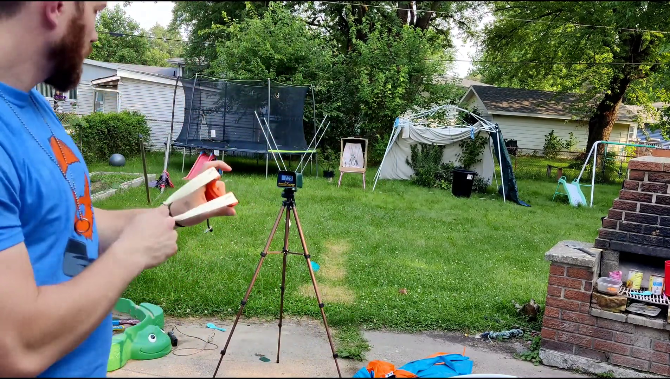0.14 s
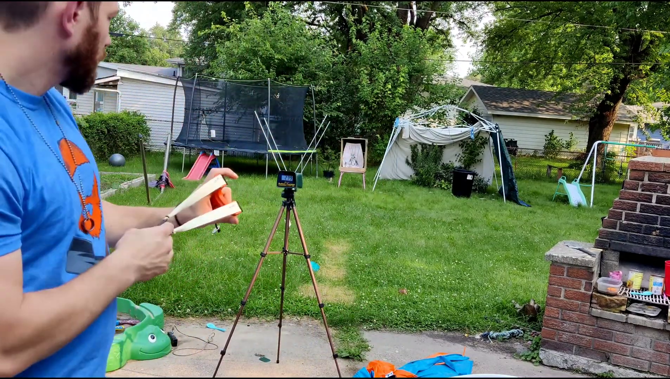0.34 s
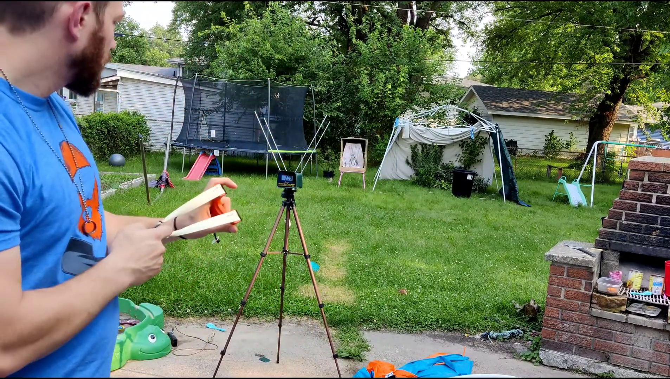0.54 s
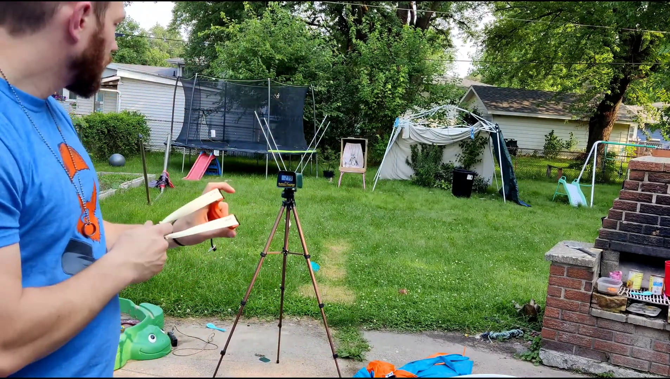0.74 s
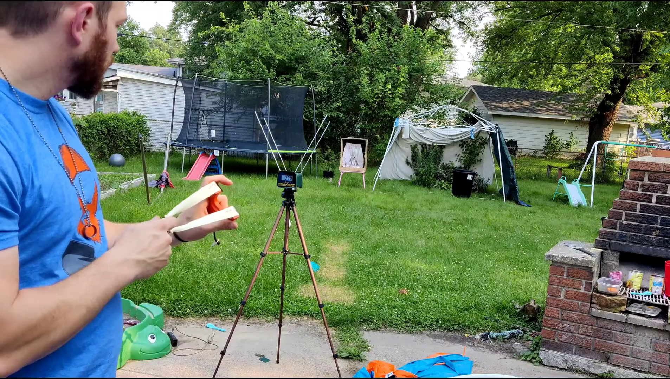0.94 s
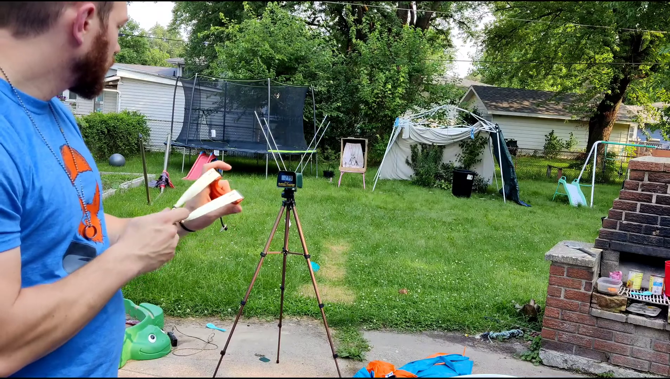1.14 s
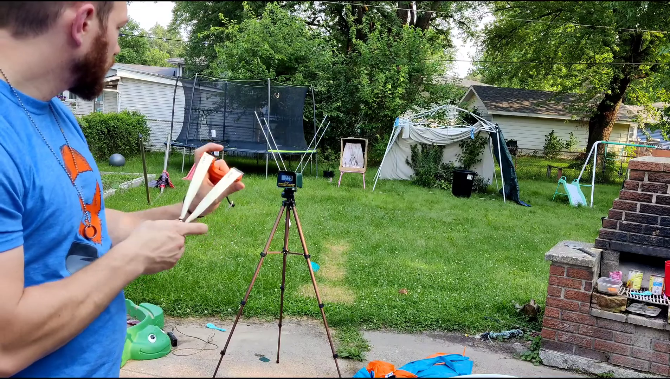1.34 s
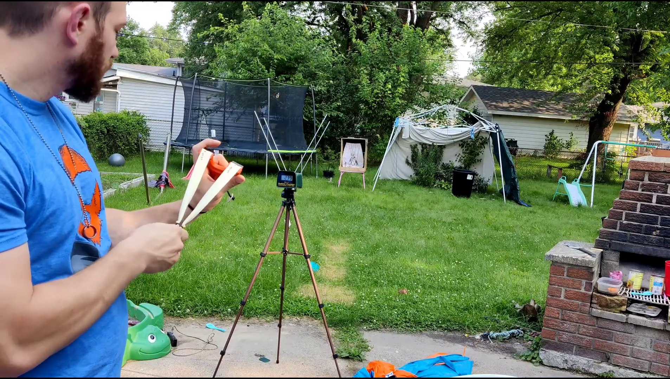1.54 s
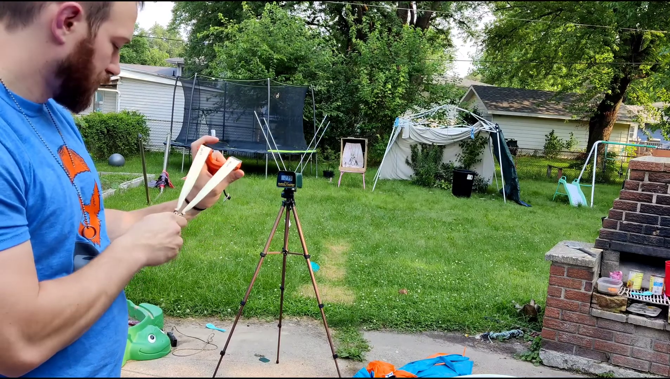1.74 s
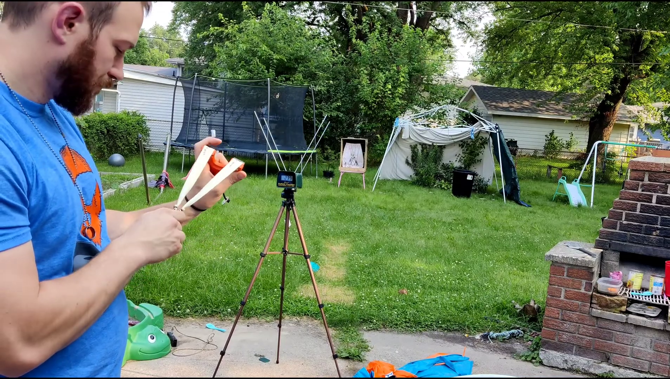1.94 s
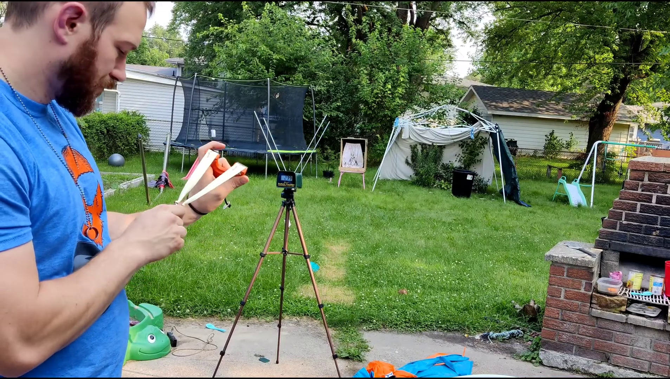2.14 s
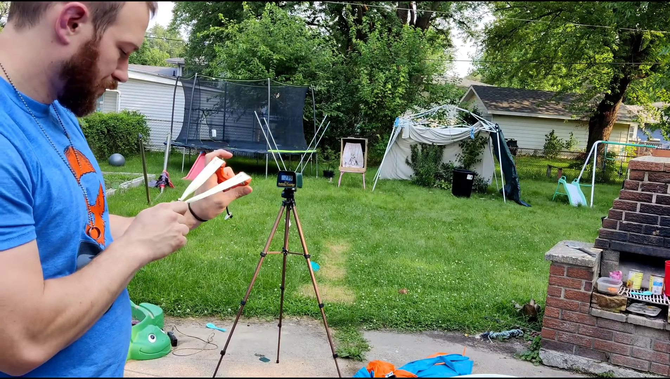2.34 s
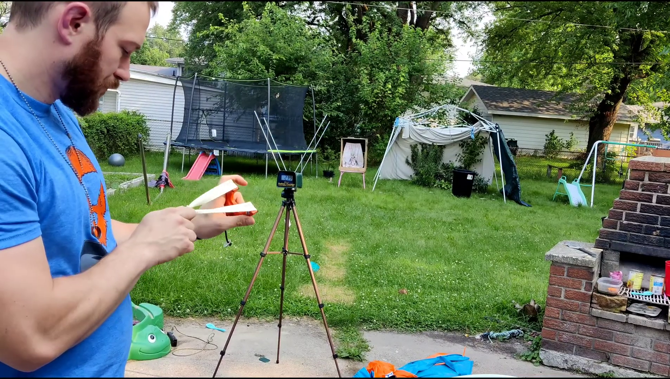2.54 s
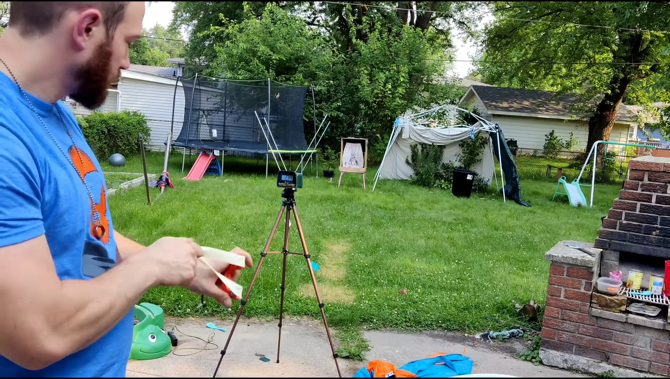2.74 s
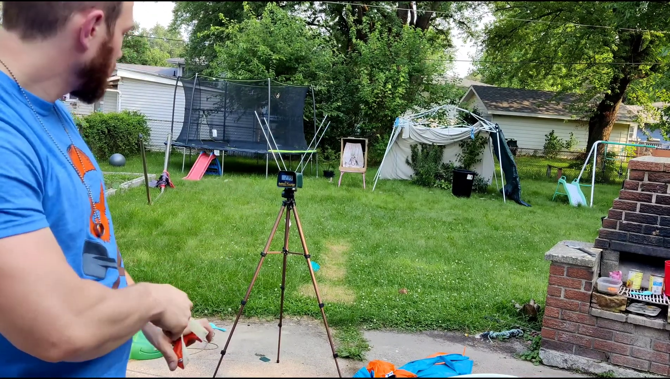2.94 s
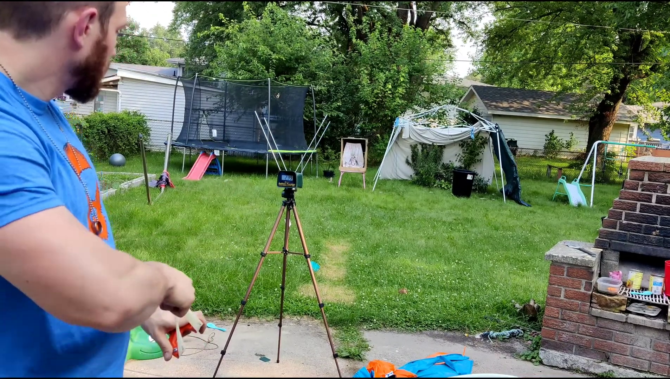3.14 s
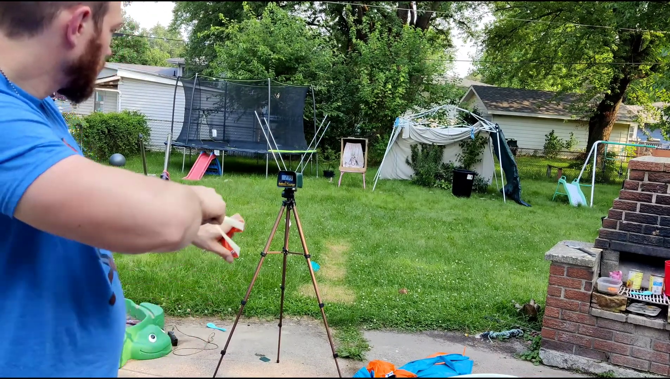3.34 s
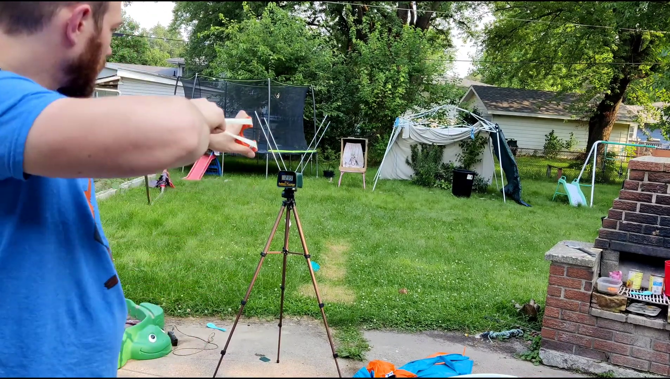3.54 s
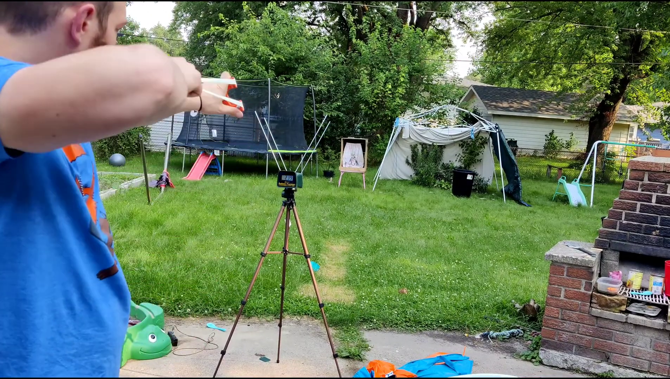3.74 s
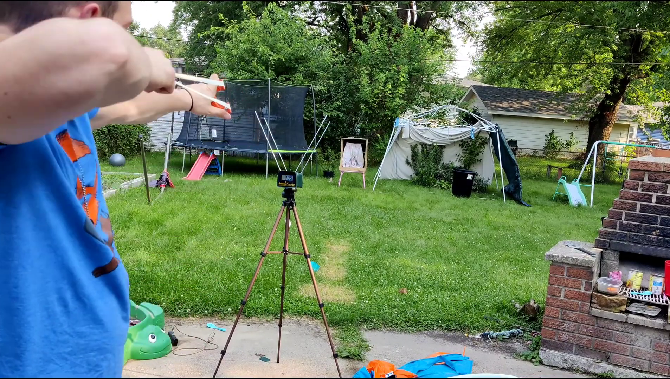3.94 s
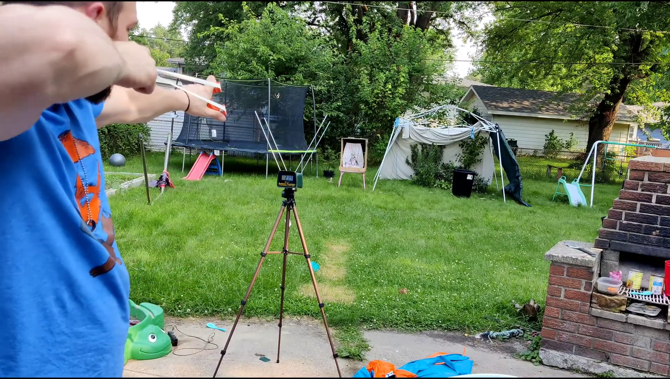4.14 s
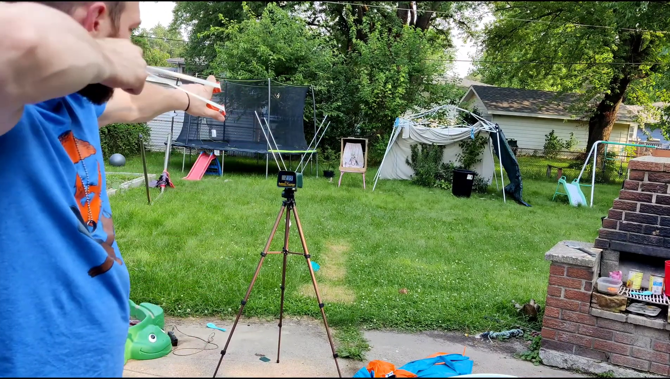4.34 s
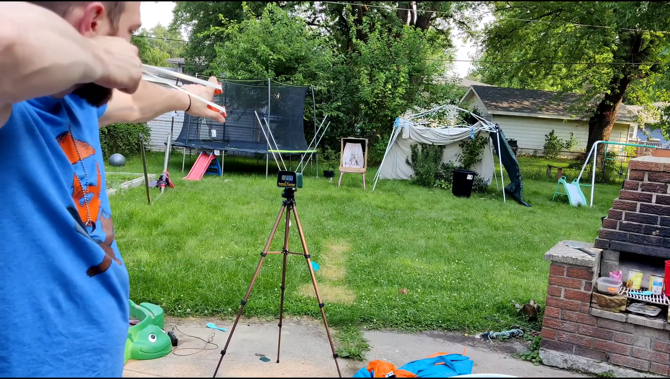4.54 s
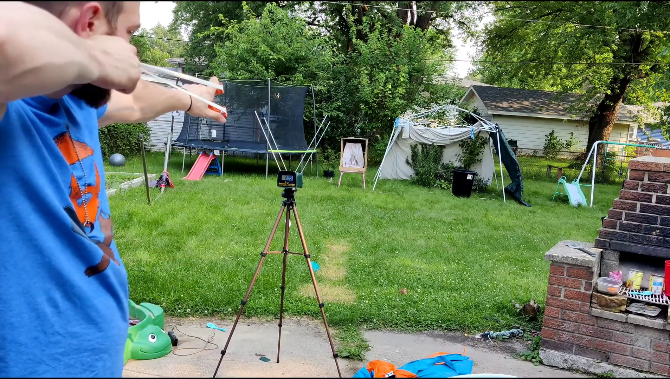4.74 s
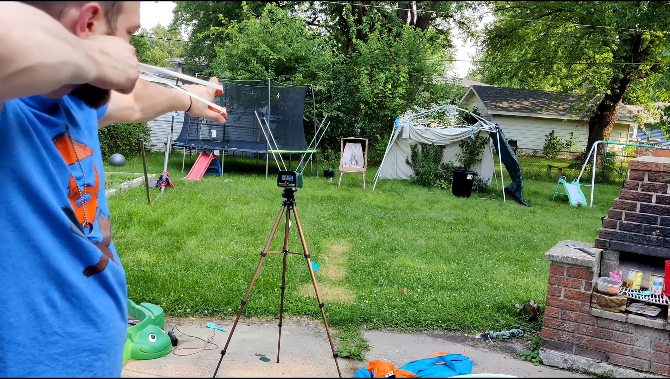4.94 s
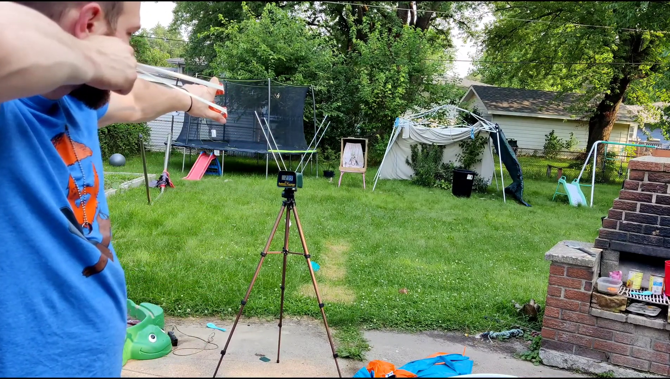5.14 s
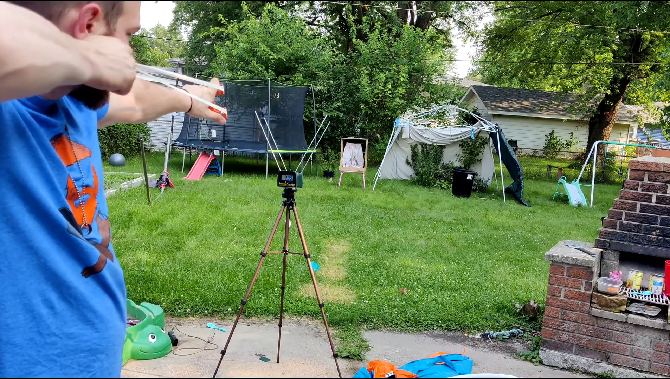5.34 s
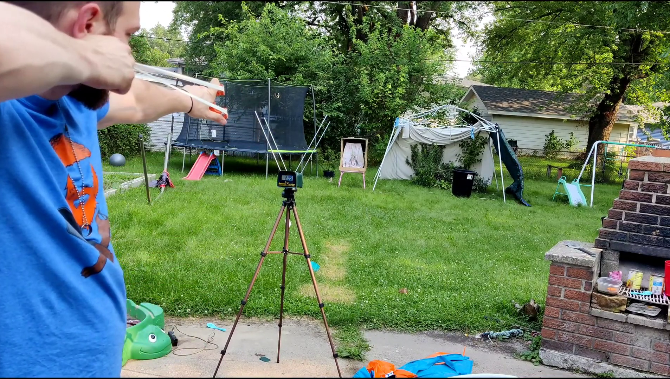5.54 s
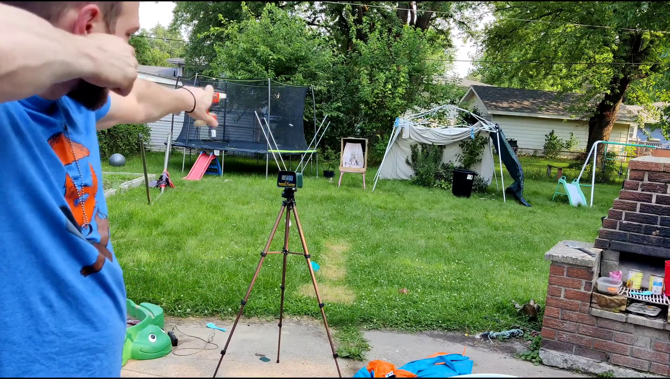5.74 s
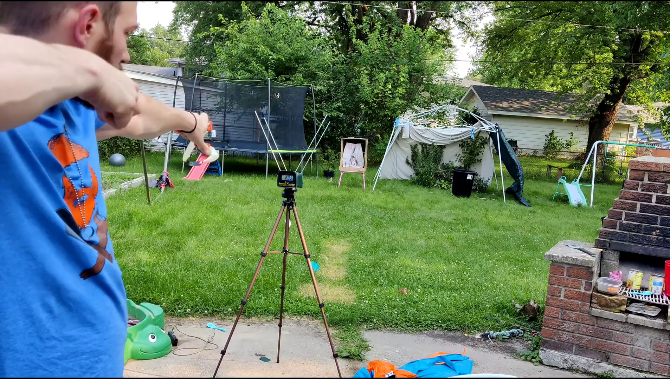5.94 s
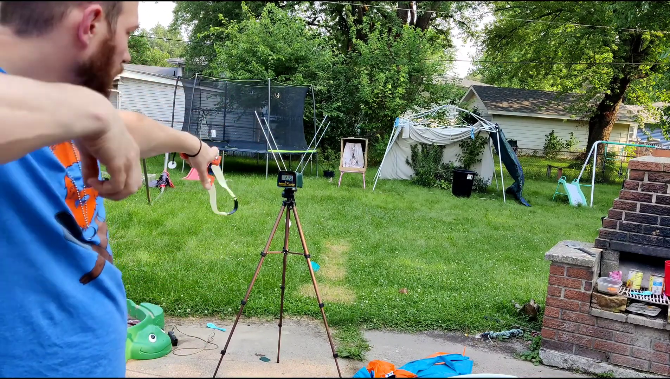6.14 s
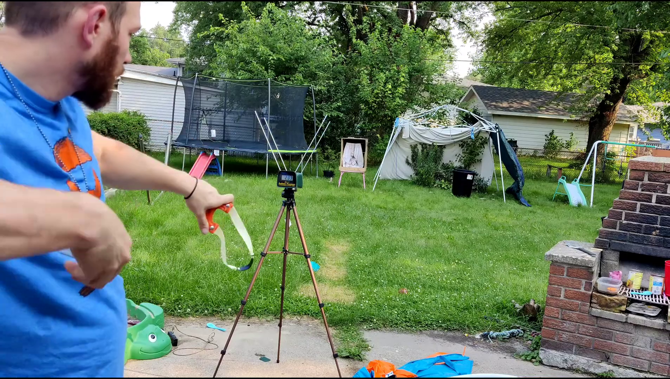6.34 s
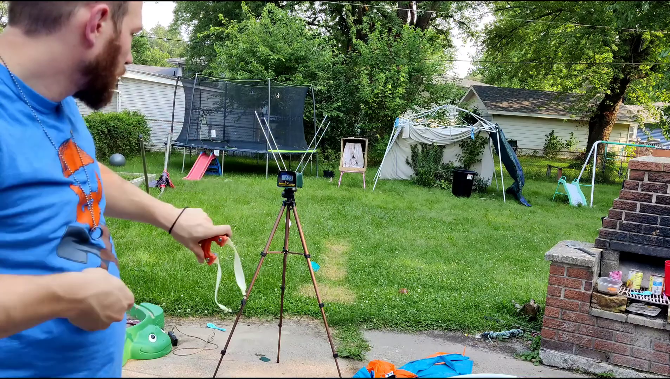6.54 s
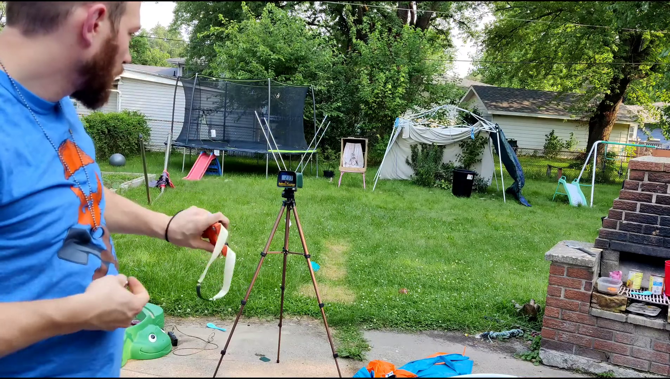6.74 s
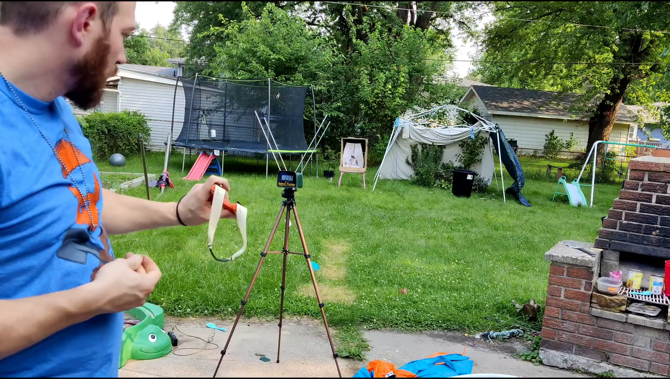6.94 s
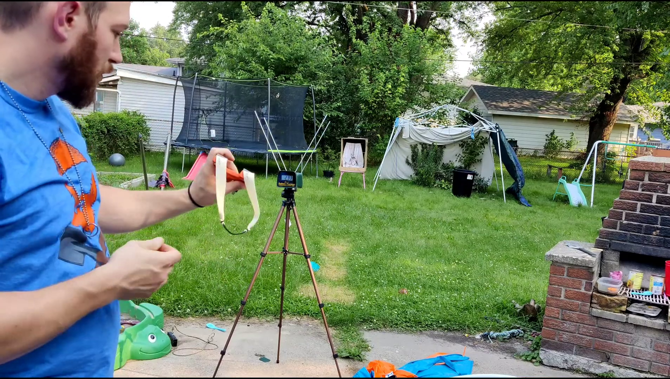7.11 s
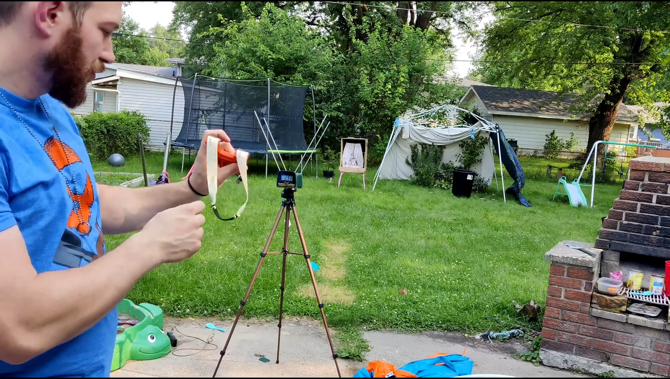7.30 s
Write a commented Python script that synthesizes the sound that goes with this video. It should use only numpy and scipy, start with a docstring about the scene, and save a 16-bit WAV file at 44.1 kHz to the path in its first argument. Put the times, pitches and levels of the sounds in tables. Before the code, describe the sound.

Birds chirp repeatedly over faint traffic and light wind, then two sharp cracks as a slingshot fires and its ball hits a board.

```python
"""A back garden: a slingshot fires a step from a phone with a microphone port at each end.
The bands snap, slap and later tick in the hand; a puff of air reaches the left port; a quarter
second later the steel ball cracks into a board down the lawn. A near sparrow and four far birds
call over town noise, fan hum and low gusts. Fences and house walls echo the shot and the birds."""
import sys
import numpy as np
from scipy import signal
from scipy.fft import rfft, irfft, next_fast_len
from scipy.io import wavfile
from scipy.ndimage import uniform_filter1d

SR = 44100
rng = np.random.default_rng(int(sys.argv[2]) if len(sys.argv) > 2 else 0)


def bounce(signal):
    """Save signal as a 16-bit WAV file at the path given by the first command-line argument."""
    frames = np.transpose(np.atleast_2d(signal))
    limited = np.clip(frames, -1, 1)
    pcm = np.round(limited * 32767).astype(np.int16)
    wavfile.write(sys.argv[1], SR, pcm)


N = 325009
T = np.arange(N) / SR
FFT_SIZE = next_fast_len(N + SR // 2)
HZ = np.arange(FFT_SIZE // 2 + 1) * SR / FFT_SIZE + 1e-3
SIDE = np.array([[.5], [-.5]])  # left, right share of a lag or pan


def undb(db):
    """Decibels to gain."""
    return 10 ** (np.asarray(db) / 20)


def on_hz(points):
    """Joins (hz, value) points on a log-frequency axis."""
    hz, value = np.transpose(points)
    return np.interp(np.log(HZ), np.log(hz), value)


def shape(x, gain):
    """Weights the spectrum by a real or complex gain."""
    return irfft(rfft(x, FFT_SIZE) * gain, FFT_SIZE)[..., :N]


def causal(points):
    """Minimum-phase gain through (hz, db) points: nothing rings before a hit."""
    cepstrum = irfft(np.log(undb(on_hz(points))), FFT_SIZE)
    cepstrum[1:FFT_SIZE // 2] *= 2
    cepstrum[FFT_SIZE // 2 + 1:] = 0
    return np.exp(rfft(cepstrum))


def ports(x, lag_ms, pan_db):
    """One sound at both ports; lag and pan are left minus right."""
    return shape(x, undb(SIDE * pan_db) * np.exp(-2j * np.pi * HZ * SIDE * lag_ms / 1000))


def level(x, db):
    """Sets the rms level."""
    return x * undb(db) / np.sqrt(np.mean(x ** 2))


def walk(rate_hz):
    """Random steps, smoothed twice; spread near 1."""
    hold = int(SR / rate_hz)
    steps = np.repeat(rng.standard_normal(N // hold + 1), hold)
    return 1.18 * uniform_filter1d(uniform_filter1d(steps, hold), hold)[:N]


def fade(t, t60_s):
    """Zero before t = 0, then 60 dB down after t60_s."""
    return (t >= 0) * np.exp(-np.log(1000) * np.abs(t) / t60_s)


def burst(t, t60_s, rise_s):
    """Fade with a rounded onset."""
    return fade(t, t60_s) * (1 - fade(t, rise_s))


def band_slaps():
    """Pouch and bands slap fingers and fork, then rebound: bursts of dull and bright crackle."""
    # start_s, level_db, t60_s, bright_over_dull_db, bright_rise_s
    slaps = [(5.876, -28, 0.026, -13, 0.00406), (5.8864, -23.5, 0.015, -4, .005),
             (5.8892, -6, 0.019, -1.5, 0.0087), (5.91, -20.5, 0.019, -1, .012),
             (5.9132, -10, 0.018, 4, .008)]
    rebound_s, rebound_db, t60_growth = .0059, -10, 1.53
    crackle = rng.standard_normal((2, 3, N)) * undb(2.27 * rng.standard_normal(N))
    dull = bright = 0
    for start_s, db, t60_s, tilt_db, rise_s in slaps:
        for k in range(4):
            t = T - (start_s + k * rebound_s)
            flap_db, flap_t60_s = db + k * rebound_db, t60_s * t60_growth ** k
            dull += undb(flap_db - tilt_db / 2) * burst(t, flap_t60_s, .0014)
            bright += undb(flap_db + tilt_db / 2) * burst(t, flap_t60_s, rise_s)
    dull_eq = causal([(60, -4), (230, -2.5), (520, -5), (900, 2), (1250, -14), (1600, .5), (1950, -8.5),
                      (2500, .5), (2950, -10.5), (3400, -.5), (4500, -24), (7500, -22), (10000, -49),
                      (16000, -51)])
    bright_eq = causal([(500, -44.5), (3000, -14), (4500, -1), (9500, -5), (12500, -.5), (15500, -2.5)])
    snap = shape(dull * crackle[0], dull_eq) + shape(bright * crackle[1], bright_eq)
    common, per_port = snap[0], snap[1:]
    return ports(common, lag_ms=-.11, pan_db=.1) + undb(.5) * per_port


def ball_hit():
    """Steel strikes; board and frame rattle and ring. Returns the direct sound and the echo feed."""
    # delay_s, level_db, t60_s, pan_db
    rattles = [(0, -10.5, 0.014, .1), (.003, -15.5, 0.02, -5), (.0085, -24, .015, 11.5),
               (0.016, -25.5, 0.05, -1)]
    # pitch_hz, level_db, t60_s
    board_modes = [(138.6, -14.5, 0.12), (245, -17.5, 0.074), (354, -24, 0.069), (701, -24, 0.068),
                   (808, -22.5, 0.07), (1050, -23, 0.044), (1440, -27.5, 0.09), (1620, -18, 0.044),
                   (2516, -29.5, 0.11), (4350, -13, 0.01), (5000, -12, 0.01), (6000, -18.5, 0.022)]
    hit_s = 6.1326
    t = T - hit_s
    rattle = sum(undb(db + SIDE * pan_db) * fade(t - delay_s, t60_s)
                 for delay_s, db, t60_s, pan_db in rattles)
    noise = rng.standard_normal((3, N))
    steel_eq = causal([(200, -8.5), (450, -10), (700, 4), (1700, 4), (2100, -1), (3300, -2), (5000, -2),
                       (9000, -1), (16000, 6)])
    crack = shape(rattle * (.75 * noise[0] + .66 * noise[1:]), steel_eq)
    crack -= shape(crack * (1 - fade(t, .054)), 1 / (1 + (8500 / HZ) ** 8))  # treble dies first
    ring = sum(undb(db) * burst(t, t60_s, rise_s=20 / hz) * np.sin(2 * np.pi * hz * t)
               for hz, db, t60_s in board_modes)
    click = shape(signal.unit_impulse(N, int(hit_s * SR)), steel_eq)
    thud = shape(ring, undb(-13.5) / (1 + (HZ / 450) ** 4))
    return crack + ring, click + thud


def air_puff():
    """Air pushed by the pouch presses on the left port, which leaks through its vent."""
    start_s, rise_s, hold_s, t60_s, vent_hz = 5.889, .012, .011, .1, 2.7
    rise = np.sin(np.pi / 2 * np.clip((T - start_s) / rise_s, 0, 1))
    fall = fade(np.clip(T - start_s - rise_s - hold_s, 0, None), t60_s)
    leak = 1j * HZ / vent_hz
    return shape(undb(-9.3) * rise * fall, leak / (1 + leak)) * undb([[0], [-30]])


def band_ticks():
    """Slack rubber unsticks in the hand: thin treble crackle."""
    # start_s, level_db, t60_s
    ticks = [(6.656, -67, .05), (6.768, -64, .04)]
    envelope = sum(undb(db) * burst(T - start_s, t60_s, .004) for start_s, db, t60_s in ticks)
    treble_eq = causal([(3000, -30), (7000, -6), (10500, 5), (15000, -10)])
    return ports(shape(envelope * rng.standard_normal(N), treble_eq), lag_ms=-.1, pan_db=4.4)


def whistles(parts, calls, slow_shake, quick_shake):
    """One bird's gliding tones; rasp shakes pitch, size and phase, the rougher the quicker."""
    out = np.zeros(N)
    loudest_mid_hz = max(parts, key=lambda part: part[5])[3]
    for start_s, call_db, call_hz in calls:
        for k, (offset_s, length_s, first_hz, mid_hz, last_hz, db, rasp) in enumerate(parts):
            i = int((start_s + offset_s) * SR) + np.arange(int(length_s * SR))
            u = np.linspace(0, 1, len(i))
            pure, shifted = np.sqrt(1 - rasp), i - 1000 * k  # each part shakes differently
            warble, real, imag = pure * slow_shake[:, shifted] + np.sqrt(rasp) * quick_shake[:, shifted]
            slope_hz = 4 * mid_hz - 3 * first_hz - last_hz
            bend_hz = 2 * (first_hz + last_hz - 2 * mid_hz)
            glide_hz = call_hz / loudest_mid_hz * (first_hz + slope_hz * u + bend_hz * u ** 2)
            pitch_hz = glide_hz * (1 + .045 * rasp * np.tanh(warble))
            phasor = np.exp(2j * np.pi * np.cumsum(pitch_hz) / SR)
            voice = phasor * (pure + np.sqrt(rasp / 2) * (real + 1j * imag)) + undb(-41) * phasor ** 3
            rolloff_db = np.clip(glide_hz - 6300, 0, None) / -130  # above the ports' resonance
            envelope = np.sin(np.pi * u) ** (.3 + .35 * rasp)
            out[i] += np.sqrt(2) * undb(call_db + db + rolloff_db) * envelope * voice.real
    return out


def birds(echo):
    """Five perched birds whistle with a breathy hiss; moving leaves flutter their echo."""
    # offset_s, length_s, first_hz, mid_hz, last_hz, level_db, rasp (0-1); transposed per call
    sparrow = [(-.04, 0.034, 5950, 6100, 6300, -17.5, .85), (-.008, 0.015, 4020, 4455, 4530, -10, 0.1),
               (.008, 0.02, 4693, 4721, 4650, -7, 0.1), (.022, .013, 4650, 4300, 3900, -10.5, .15),
               (.033, .016, 3900, 3680, 3560, -19, .35), (.031, .035, 6300, 5810, 5440, -21, .9),
               (.055, .03, 3680, 3600, 3480, -21.5, .4), (.086, .032, 3456, 3520, 3450, -20, .4)]
    riser = [(0, .035, 4200, 4500, 4800, -7, .6), (.02, .06, 4850, 5000, 5100, 0, .62),
             (.025, .075, 5650, 5800, 5950, -1, .6), (.03, .08, 6400, 6500, 6400, -9, 1),
             (.115, .04, 4000, 4200, 4200, -4, .5)]
    cheep = [(-.03, 0.033, 3340, 3340, 3200, -2, 0.97), (0, 0.0434, 4250, 4852, 4600, 3.5, 0.62),
             (.01, 0.04, 5280, 5335, 5310, 0, 0.5), (.015, .04, 3100, 3150, 3200, -7, .7),
             (0.074, 0.0656, 4100, 3900, 3840, -4, 0.68)]
    faller = [(0, .04, 4405, 4230, 3980, -4, .6), (.03, 0.035, 3600, 3477, 3380, -0.5, 0.5),
              (.07, .03, 3250, 3180, 3120, -1.5, .4), (.112, 0.035, 2850, 2720, 2640, -5, .5)]
    flick = [(0, .035, 6800, 6200, 5800, 0, .55)]
    # start_s, level_db, pitch_hz (middle of the loudest part)
    sparrow_calls = [(.648, -33.5, 4690), (1.757, -36.5, 4720), (2.885, -34.5, 4590), (4.050, -36, 4650),
                     (5.201, -34, 4680), (6.702, -37.5, 4700)]
    riser_calls = [(.165, -58.5, 5160), (0.729, -57.5, 5180), (2.34, -58.5, 5000), (2.988, -59, 4910),
                   (4.469, -58, 4890), (5.955, -54.5, 4770)]
    cheep_calls = [(1.259, -59.5, 5050), (1.325, -65, 4460), (1.775, -57.5, 4880), (3.668, -53.5, 4760),
                   (5.16, -53, 4850), (6.714, -56, 4990)]
    faller_calls = [(1.405, -60, 3370), (2.117, -58, 3445), (4.531, -59.5, 3420), (5.37, -60.5, 3410),
                    (6.959, -59.5, 3440)]
    flick_calls = [(0.134, -59.5, 6440), (1.115, -62.5, 6200), (1.31, -67, 6180), (4.779, -66, 3430)]
    # per bird: lag_ms, pan_db, echo_db
    perches = [(-0.245, 6, -20), (-0.468, 2.5, -14), (-0.47, 3.2, -14.5), (0.26, 1, -15), (-0.375, 3, -13)]
    singers = [(sparrow, sparrow_calls), (riser, riser_calls), (cheep, cheep_calls),
               (faller, faller_calls), (flick, flick_calls)]
    shake_hz, leaves_hz, flutter_share = (220, 420), 45, .2
    shakes = [level(shape(rng.standard_normal((3, N)), np.exp(-(HZ / hz) ** 2)), 0) for hz in shake_hz]
    breath_eq = undb(on_hz([(2000, -24), (6500, -8), (9000, -28.5), (15000, -41)]))
    out = 0
    for (parts, calls), (lag_ms, pan_db, echo_db) in zip(singers, perches):
        song = whistles(parts, calls, *shakes)
        song += shape(song * rng.standard_normal(N), breath_eq)
        leaves = level(shape(rng.standard_normal((2, N)), np.exp(-(HZ / leaves_hz) ** 2)), 0)
        flutter = np.sqrt(1 - flutter_share) + np.sqrt(flutter_share) * leaves
        out += ports(song, lag_ms, pan_db) + undb(echo_db) * flutter * shape(song, echo)
    return out


def garden_echo():
    """Frequency response per port: scattered wall echoes and a tail that builds, then dies by band."""
    # delay_s, level_db
    wall_echoes = [(.009, -6.5), (0.036, -23), (.05, -32.5), (.068, -30.5)]
    # centre_hz, t60_s, level_db
    tail_bands = [(149.8, 0.79, -3), (703, 0.36, 6.5), (1700, 0.46, 2.5), (3170, 0.72, 3.5),
                  (6200, 0.51, 5), (9000, 0.49, 1.5), (13000, 0.35, -4.5)]
    t = T[:SR // 2]
    tail_noise, wall_noise = rng.standard_normal((2, 2, len(t)))
    tail = 0
    for centre_hz, t60_s, db in tail_bands:
        band = on_hz([(hz, float(hz == centre_hz)) for hz, _, _ in tail_bands])
        tail += shape(tail_noise, band)[:, :len(t)] * undb(db) * fade(t, t60_s)
    clumps = undb(1.5 * walk(70)[:len(t)])  # off scattered sheds and fences
    build_up = 1 - np.exp(-(t / .035) ** 2)
    tail *= clumps * build_up * undb(-20.5)
    walls = wall_noise * sum(undb(db) * fade(t - delay_s, .055) for delay_s, db in wall_echoes)
    treble_loss = 1 + (HZ / 9000) ** 4  # rough walls
    return rfft(tail, FFT_SIZE) + rfft(walls, FFT_SIZE) / treble_loss


def town():
    """Traffic, fans and leaves from all sides: octave bands that swell together and flicker alone."""
    # freq_hz, density_db
    spectrum = [(15, 3), (38, -0.5), (92, -6), (129, -7), (185, -14), (245, -14.5), (382, -22.5),
                (800, -23.5), (1080, -25.5), (1260, -34.5), (1600, -31.5), (3080, -38), (6300, -40.5),
                (7700, -51.5), (9000, -66), (12500, -67), (15500, -100.5)]
    # lag_ms, share_200hz_db, share_2khz_db
    directions = [(-.48, -2.5, -6), (-.24, -11, -6.5), (0, -4.5, -6.5), (0.241, -6.5, -9), (0.451, 3, -10)]
    wash = power = out = 0
    for lag_ms, low_db, high_db in directions:
        share = undb(on_hz([(200, low_db), (2000, high_db)]))
        wash += ports(shape(rng.standard_normal(N), share), lag_ms, pan_db=.8)
        power += share ** 2
    town_eq = undb(on_hz(spectrum)) / np.sqrt(power)
    swell_db = 1.2 * walk(.68)
    for octave in range(4, 15):
        band = np.cos(np.pi / 2 * np.clip(np.log2(HZ) - octave, -1, 1)) ** 2
        flicker_db = 1.23 * walk(6) * min(octave / 9, 1)  # deep bands hold steadier
        out += shape(wash, town_eq * band) * undb(swell_db + flicker_db)
    return level(out, db=-41)


def fan_hum():
    """Fans and compressors off to the right: wavering noise lines and steady motor tones."""
    # centre_hz, width_hz, level_db
    hum_lines = [(85.43, 3, -48.5), (120.14, 4.1, -51.5), (234.3, 55, -58), (735.5, 25, -64.5),
                 (1180, 9, -75.5)]
    # pitch_hz, level_db
    motor_tones = [(818.3, -66), (1109, -72)]
    peaks = sum(undb(db) / np.sqrt(width_hz) / (1 + (2 * (HZ - hz) / width_hz) ** 2)
                for hz, width_hz, db in hum_lines)
    hum = shape(rng.standard_normal(N), np.sqrt(2 * SR / np.pi) * peaks)
    whine = sum(np.sqrt(2) * undb(db) * np.sin(2 * np.pi * hz * T) for hz, db in motor_tones)
    return ports(hum + whine, lag_ms=.38, pan_db=.74)


def breeze():
    """Low gusts buffet each port alone, the left one most."""
    # time_s, left_level_db
    gusts = [(0.0, -37), (0.22, -40), (0.33, -27.5), (0.53, -40.5), (1.19, -44.5), (1.5, -29.5),
             (1.72, -41), (1.97, -41), (2.07, -37), (2.24, -41), (3.0, -55.5), (5.34, -51), (6.2, -52),
             (6.34, -31), (6.49, -36.5), (6.75, -52), (7.37, -51)]
    rumble_eq = undb(on_hz([(4, 13), (15, 19.5), (40, 10), (90, -2.5), (300, -66.5)]))
    rumble = shape(rng.standard_normal((2, N)), rumble_eq) * undb(2.8 * walk(7))
    gust_db = np.interp(T, *np.transpose(gusts))
    return level(rumble, 0) * undb(gust_db) * undb([[0], [-8]])


def scene():
    """The shot and its echo, coloured by the ports' resonance, over birds and background."""
    # freq_hz, gain_db
    port_response = [(20, 11.5), (1000, -1), (4000, 1), (5600, 5), (6250, 9), (6800, 0), (7500, 0),
                     (9000, -15.5), (12000, -21.5), (16000, -22.5)]
    # freq_hz, pan_db
    shot_pan = [(2000, 0.5), (4500, -2), (8000, 3.5), (14000, 3.5)]
    echo = garden_echo()
    snap = band_slaps()
    hit, hit_feed = ball_hit()
    shot = snap + hit + shape(undb(-34.5) * snap + undb(-14) * hit_feed, echo)
    shot = shape(shot, causal(port_response) * undb(SIDE * on_hz(shot_pan)))
    return shot + air_puff() + birds(echo) + town() + fan_hum() + breeze() + band_ticks()


def record(dry):
    """The phone's steep low-pass."""
    cutoff_hz = 15200
    return signal.sosfilt(signal.ellip(8, .2, 70, cutoff_hz, fs=SR, output="sos"), dry)


dry = scene()
out = record(dry)
bounce(out)
```